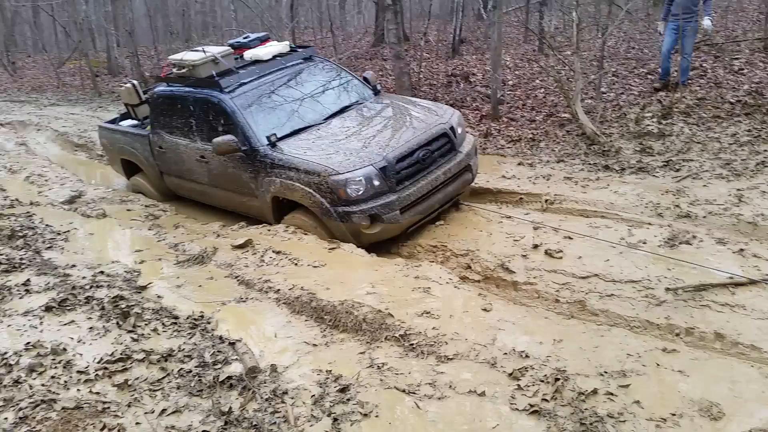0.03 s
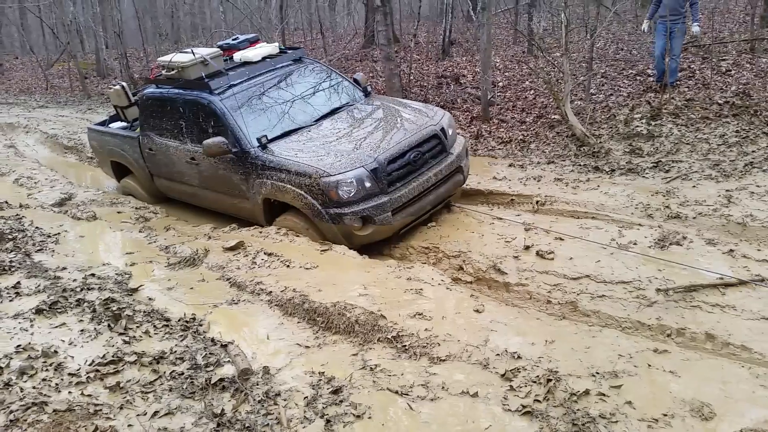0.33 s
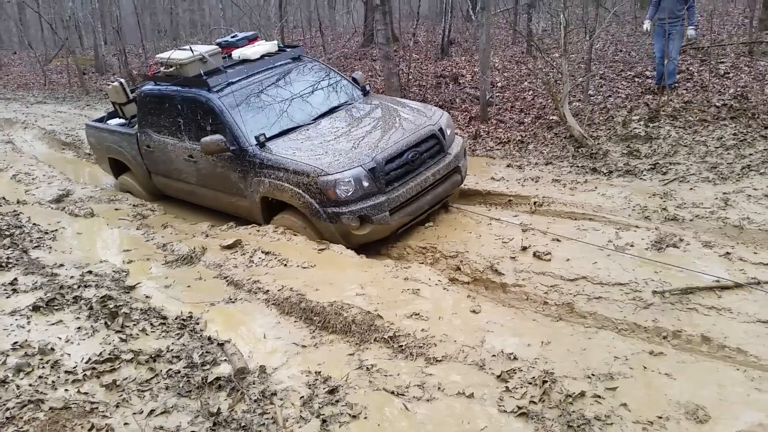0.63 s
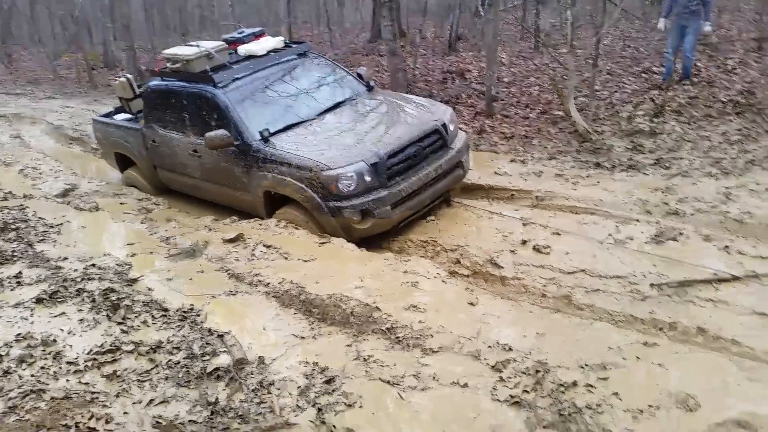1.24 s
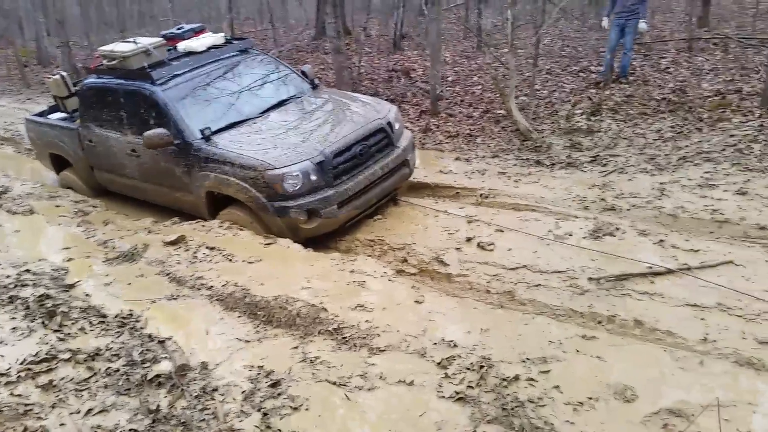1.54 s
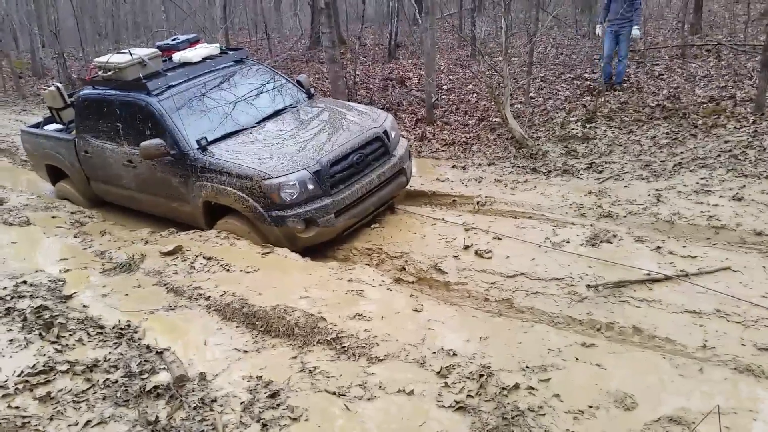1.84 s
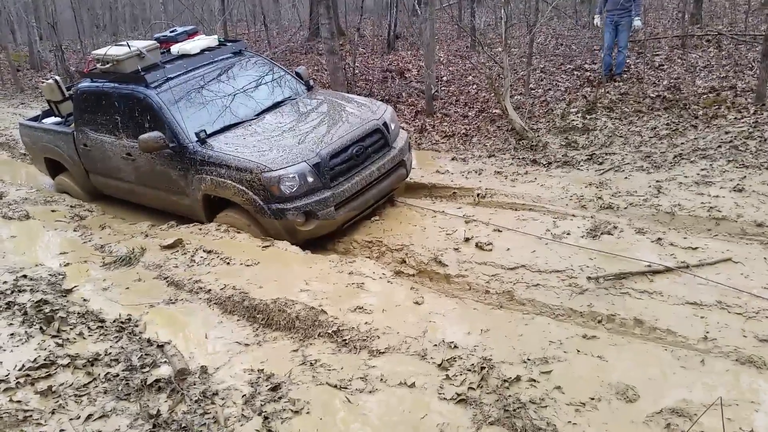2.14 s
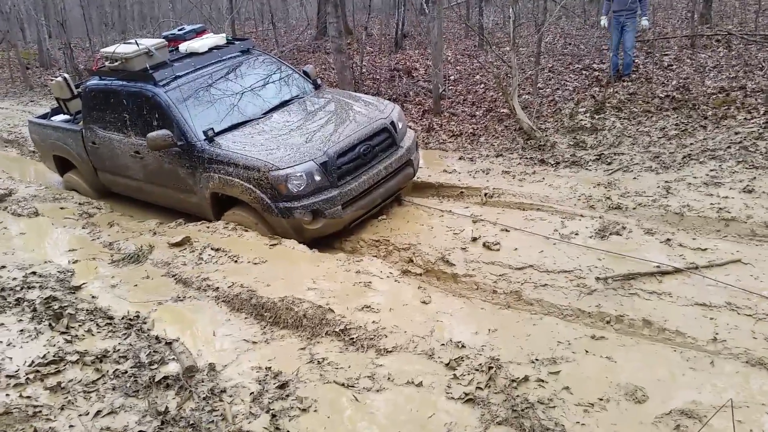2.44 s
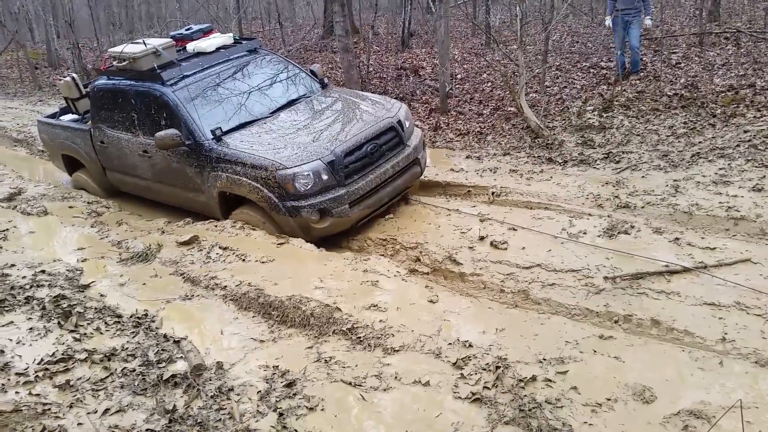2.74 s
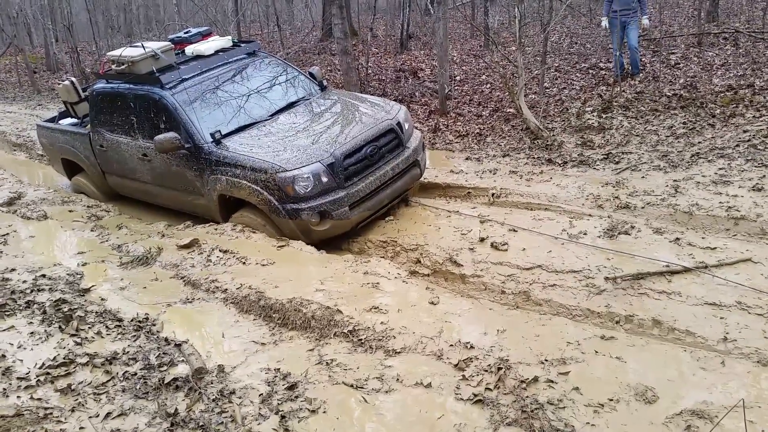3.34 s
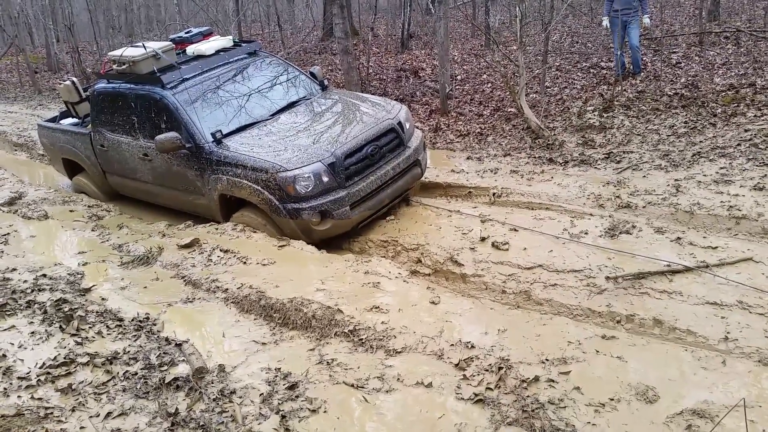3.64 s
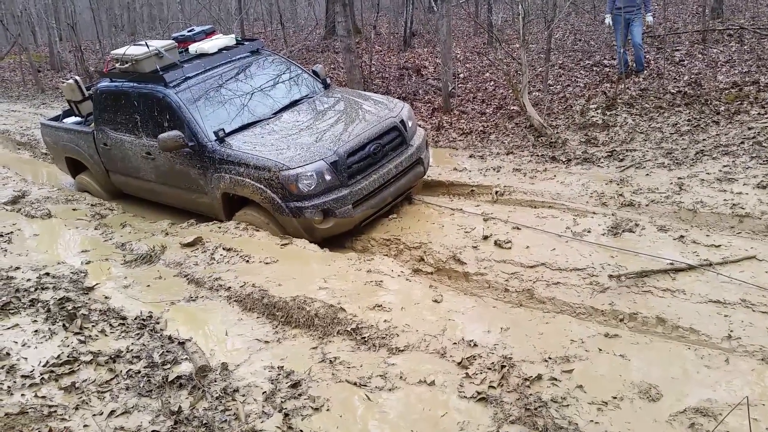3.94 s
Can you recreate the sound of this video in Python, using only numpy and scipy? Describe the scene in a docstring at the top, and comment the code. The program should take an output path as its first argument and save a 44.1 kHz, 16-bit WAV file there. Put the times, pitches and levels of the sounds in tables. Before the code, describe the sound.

After a brief silence, an idling pickup engine fades in at about 0.4 seconds and runs steadily, a low exhaust throb under fan hiss and belt whirr. From 1.1 seconds wind buffets the microphone, with light handling rubs and clicks. A short low boom swells at 1.9 seconds. The gusts are strongest from 2.4 to 3.4 seconds, with a dull knock at 3.2, while the idle carries on.

```python
"""After a short silence a six-cylinder pickup fades in, stuck in a mud hole in a wood, some metres from
a hand-held phone. It idles throughout: exhaust puffs throb under the hiss and whirr of fan, belts and
pulleys, with faint high ticks. From about 1.1 s gusts buffet the two microphone ports and the hand rubs
and knocks on the case. A short low boom swells at 1.9 s. The wind hits hardest from 2.4 to 3.4 s,
and the heaviest knock lands at 3.2 s."""
import sys
import numpy as np
from scipy import signal
from scipy.fft import rfft, irfft
from scipy.io import wavfile
from scipy.ndimage import uniform_filter1d

SR = 44100
rng = np.random.default_rng(int(sys.argv[2]) if len(sys.argv) > 2 else 0)


def master(y):
    """Save y as 16-bit WAV."""
    cut = np.clip(np.atleast_2d(y).T, -1, 1)
    pcm = np.round(cut * 32767)  # scale
    wavfile.write(sys.argv[1], SR, pcm.astype(np.int16))


N = 176400
FIRING_HZ, SPEED_DRIFT = 33.64, .003


def exhaust(t, firings, gas_db=-38.5, side_db=-13, fan_hz=72.5, fan_db=-41.5):
    """The low throb: a puff of gas per firing, the pipe's steady tones and the fan's hum."""
    # Tone colour of the puffs. Each row: frequency in Hz, relative level in dB.
    puff_spectrum = [(20, -12.5), (35, -4.5), (70, -4.5), (125, 0), (160, -2.5), (205, -9), (245, -7.5),
                     (285, -10.5), (345, -12.5), (450, -17.5), (650, -31), (1000, -37.5), (2000, -69)]
    # Pipe tones. Each row: multiple of the firing rate, level in dB before the rumble's rise and fall.
    pipe_tones = [(1, -57.5), (1.5, -54), (2, -53), (3, -49), (3.5, -45.5), (4, -40), (4.5, -44.5),
                  (7.5, -54.5)]
    # Rise and fall of the whole rumble. Each row: time in seconds, gain in dB.
    rumble_ride = [(.6, -0.5), (1.5, -2), (2.2, 0), (2.6, 1), (3.2, 1), (3.6, 1), (4, -0.5)]
    puff_size = undb(rng.standard_normal(256))[firings.astype(int)]  # 1 dB of scatter
    puffs = puff_size * np.exp(-(firings % 1))
    mid, side = colour(puffs * rng.standard_normal((2, N)), puff_spectrum)
    gas = undb(gas_db) * (mid + undb(side_db) * side * np.array([[1], [-1]]))
    hum = 0
    for multiple, db in pipe_tones + [(fan_hz / FIRING_HZ, fan_db)]:
        amplitude = np.sqrt(2) * undb(db + waver(6.22))
        hum = hum + amplitude * np.sin(2 * np.pi * (multiple * firings + rng.random()))
    return (gas + hum) * curve(t, rumble_ride) * ports(left_db=-.4, right_db=-.44)


def engine_bay(t, firings, throb_depth=.05, flicker_db=.65, direct_below_hz=1760, treble_hz=6860):
    """Fan and belt hiss and whirring pulleys, all throbbing with the crankshaft."""
    # Fan and belt hiss at each port. Each row: frequency in Hz, relative level in dB.
    left_spectrum = [(300, 2.5), (700, -4.5), (1000, -2.5), (1350, 4), (1620, 1.5), (1850, -7.5),
                     (2450, -13.5), (2900, -8.5), (3400, -8), (3950, -1.5), (5000, -12), (6500, -27.5),
                     (8100, -43), (9200, -34.5), (10200, -24), (11500, -30.5), (14000, -33), (15600, -26)]
    right_spectrum = [(300, -12), (750, -1), (1030, 2.5), (1180, -4.5), (1350, 5), (1620, 2.5),
                      (2100, -3.5), (3000, -9), (3600, -10.5), (4100, -12), (5000, -17.5), (6300, -39),
                      (8100, -51.5), (9200, -41), (10200, -31.5), (12500, -30.5), (14200, -26.5),
                      (15600, -32)]
    # Level of the hiss before its treble lift: left in dB, right in dB.
    hiss_db = [-47.5, -52]
    # Wandering lift of the highest hiss. Each row: time in seconds, gain in dB.
    treble_ride = [(.5, 4), (.9, 4), (1.1, 4.5), (1.37, 9.5), (1.55, 4.5), (1.95, 5), (2.2, 2), (2.7, 1.5),
                   (2.95, 4), (3.3, 1), (4, 0)]
    # Pulley whirr. Each row: pitch in Hz, rough width in Hz, left level in dB, right level in dB.
    pulleys = [(1177, 14, -61.5, -81.5), (1246, 26, -64, -69), (1277, 18, -57.5, -65),
               (1354.6, 37, -59, -57), (1386, 14, -64.5, -64), (1410, 38, -65, -73.5),
               (1460, 27, -66, -70.5), (1575, 19, -68, -63), (1618, 74, -61.5, -62.5)]
    turns = firings / 3  # three firings per crankshaft turn
    throb = (1 + throb_depth * np.cos(2 * np.pi * turns)) * undb(flicker_db * waver(25.01))
    # Most of the lower hiss comes straight from the truck; the rest is scattered by the trees.
    hz = np.arange(N // 2 + 1) * SR / N
    direct_share = .63 / (1 + (hz / direct_below_hz) ** 10)
    direct = from_left(t, rng.standard_normal(N))
    scattered = rng.standard_normal((2, N))
    air = irfft(np.sqrt(direct_share) * rfft(direct) + np.sqrt(1 - direct_share) * rfft(scattered), N)
    hiss = ports(*hiss_db) * np.array([colour(air[0], left_spectrum), colour(air[1], right_spectrum)])
    treble = signal.sosfiltfilt(signal.butter(4, treble_hz, "high", fs=SR, output="sos"), hiss)
    whirr = 0
    for pitch, width, left, right in pulleys:
        narrow_noise = band(pitch, octaves=width / pitch / np.sqrt(2), channels=1)[0]
        whirr = whirr + ports(left, right) * from_left(t, narrow_noise)
    return (hiss + treble * (curve(t, treble_ride) - 1) + whirr) * throb


def wind(t, breeze_db=-48, waver_db=3.5):
    """Eddies on each port, unrelated left and right, driven by gusts over a light breeze."""
    # Gusts. Each row: peak time and half length in seconds, left and right level in dB.
    gusts = [(1.18, .04, -38.5, -42), (1.543, 0.16, -38, -40), (1.791, 0.037, -49, -28.5),
             (1.894, 0.043, -38.5, -33), (2.366, 0.033, -27.5, -35.5), (2.473, 0.018, -33.5, -27),
             (2.555, 0.021, -27.5, -20.5), (2.84, 0.11, -43, -31.5), (3.042, 0.048, -29, -20.5),
             (3.207, 0.053, -36, -23), (3.356, 0.053, -33.5, -25), (3.98, .05, -37.5, -50)]
    # Bass-heavy colour of the buffeting. Each row: frequency in Hz, relative level in dB.
    eddy_spectrum = [(15, -37), (32, 3), (65, 0), (110, 3), (170, -3.5), (260, -23.5), (400, -24.5),
                     (800, -54), (2000, -86)]
    breeze_power = undb(breeze_db + waver_db * waver(8.23)) ** 2
    gust_power = sum((ports(left, right) * swell(t, at, half)) ** 2 for at, half, left, right in gusts)
    return np.sqrt(breeze_power + gust_power) * colour(rng.standard_normal((2, N)), eddy_spectrum)


def handling(t):
    """The hand on the phone: soft, dead knocks of a cycle or two, and brief rubs on the case."""
    # Knocks. Each row: time in seconds, pitch in Hz, half length in seconds,
    # left and right envelope peak in dB.
    knocks = [(1.338, 610, 0.00051, -28.5, -36), (1.473, 505, 0.0012, -34.5, -40),
              (1.801, 920, 0.00032, -22, -34), (2.1325, 517, .001, -36, -46),
              (3.219, 170, 0.0021, -37, -10.5), (3.335, 470, 0.00051, -24.5, -29)]
    # Rubs. Each row: time and half length in seconds, centre in Hz, width in octaves,
    # left and right level in dB.
    rubs = [(1.13, 0.012, 3400, 0.55, -58, -63), (1.257, 0.17, 1480, 0.79, -57, -57),
            (1.4404, 0.0017, 4770, 0.38, -53.5, -60), (1.4405, .002, 12000, 0.26, -55, -68),
            (1.458, 0.01, 3100, 0.46, -50, -65), (1.8004, 0.0012, 2790, .2, -36.5, -48),
            (1.807, 0.0032, 3930, .16, -42.5, -62), (1.811, 0.0089, 2330, 0.54, -46, -63),
            (1.8146, 0.0055, 3960, 0.14, -43.5, -63), (1.823, 0.0012, 3730, 0.21, -51, -63),
            (3.843, .001, 11000, .25, -60, -68)]
    touches = 0
    for at, hz, half, left, right in knocks:
        touches = touches + ports(left, right) * swell(t, at, half) * np.sin(2 * np.pi * hz * (t - at))
    for at, half, hz, octaves, left, right in rubs:
        touches = touches + ports(left, right) * swell(t, at, half) * band(hz, octaves)
    return touches


def boom(t, start_s=1.88, attack_s=.015, hold_s=.09, release_s=.13, level_db=-33):
    """A short low swell that rises a little in pitch."""
    age = t - start_s
    envelope = np.clip(age / attack_s, 0, 1) * np.exp(-np.maximum(age - hold_s, 0) / release_s)
    hz = 96 + 40 * age
    tone = np.sqrt(2) * np.sin(2 * np.pi * np.cumsum(hz) / SR)
    return undb(level_db + 1.4 * waver(25)) * envelope * tone


def ticks(t, per_second=6, level_db=-65, scatter_db=3.5, decay_s=.0005):
    """Sparse, tiny high ticks at random moments."""
    hits = (rng.random(N) < per_second / SR) * undb(level_db + scatter_db * rng.standard_normal(N))
    envelope = signal.lfilter([1], [1, -np.exp(-1 / (decay_s * SR))], hits)
    return envelope * band(hz=12000, octaves=.25) * ports(left_db=0, right_db=-4)


def undb(db):
    """Decibels to gain."""
    return 10 ** (np.asarray(db) / 20)


def unit(x):
    """Each channel at rms 1."""
    return x / np.sqrt(np.mean(x ** 2, axis=-1, keepdims=True))


def curve(t, rows):
    """A fader ride: gain along rows of seconds and dB."""
    return undb(np.interp(t, *np.array(rows).T))


def colour(x, points):
    """Equalise along points of Hz and dB, then set to rms 1."""
    hz, db = np.array(points).T
    f = np.arange(N // 2 + 1) * SR / N
    gain = undb(np.interp(np.log(f + 1), np.log(hz), db))
    return unit(irfft(rfft(x) * gain, N))


def band(hz, octaves, channels=2):
    """Noise in a bell-shaped band, unrelated in each channel."""
    f = np.arange(N // 2 + 1) * SR / N
    bell = np.exp(-.5 * (np.log2((f + 1) / hz) / octaves) ** 2)
    return unit(irfft(rfft(rng.standard_normal((channels, N))) * bell, N))


def waver(rate_hz):
    """A smooth random wobble at rms 1."""
    hold = int(SR / rate_hz)
    steps = np.repeat(rng.standard_normal(256)[:N // hold + 1], hold)
    return unit(uniform_filter1d(uniform_filter1d(steps, hold), hold)[:N])


def swell(t, at, half):
    """A bell-shaped envelope."""
    return np.exp(-.5 * ((t - at) / half) ** 2)


def ports(left_db, right_db):
    """Gains at the two microphone ports."""
    return undb([[left_db], [right_db]])


def from_left(t, x, lag_s=.0002):
    """One sound at both ports, reaching the right one a little later."""
    return np.array([x, np.interp(t - lag_s, t, x)])


def scene():
    """The truck at a slightly drifting idle, with a boom, wind, handling and ticks."""
    t = np.arange(N) / SR
    firings = np.cumsum(FIRING_HZ * (1 + SPEED_DRIFT * waver(3))) / SR  # running count
    return exhaust(t, firings) + engine_bay(t, firings) + boom(t) + wind(t) + handling(t) + ticks(t)


def record(dry):
    """The phone cuts the lowest bass, fades in and cuts the top."""
    silence_s, fade_s = .37, .35
    low_cut_hz, high_cut_hz = 41, 15750
    fade = np.clip((np.arange(N) / SR - silence_s) / fade_s, 0, 1) ** 1.01
    thinned = signal.sosfilt(signal.butter(2, low_cut_hz, "high", fs=SR, output="sos"), dry)
    return signal.sosfilt(signal.ellip(10, .2, 80, high_cut_hz, fs=SR, output="sos"), thinned * fade)


dry = scene()
out = record(dry)
master(out)
```